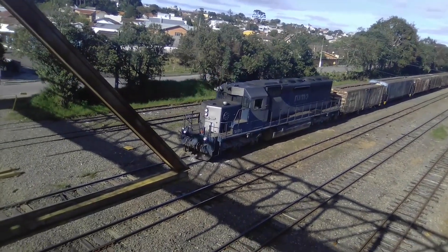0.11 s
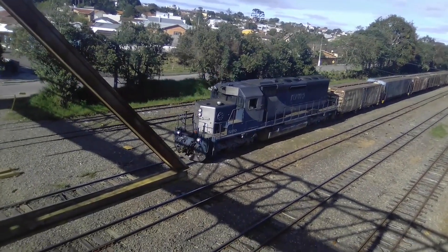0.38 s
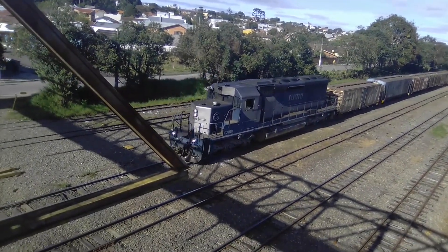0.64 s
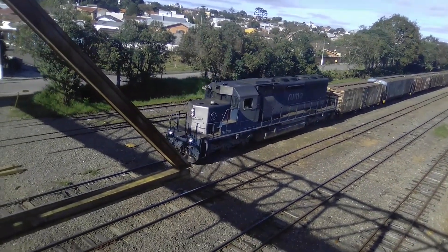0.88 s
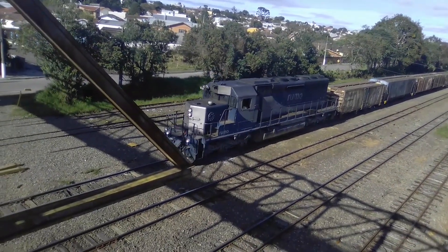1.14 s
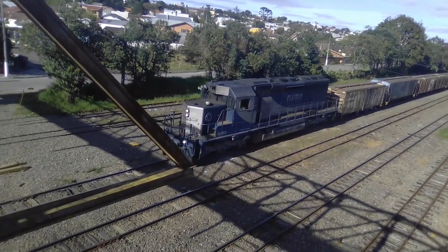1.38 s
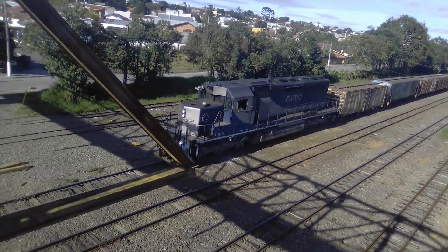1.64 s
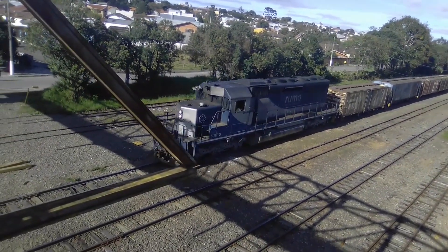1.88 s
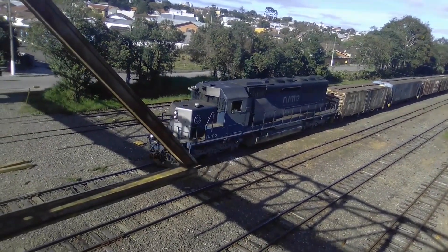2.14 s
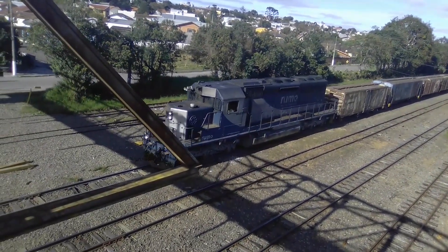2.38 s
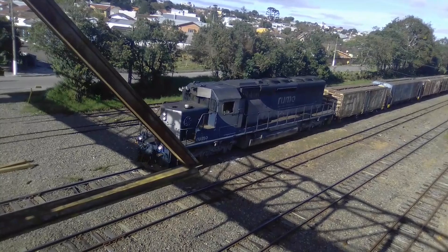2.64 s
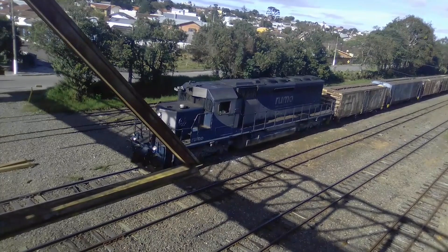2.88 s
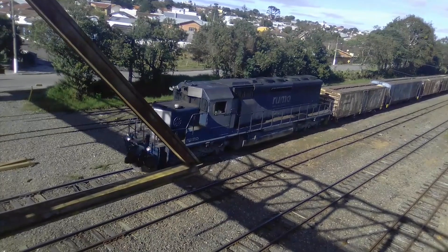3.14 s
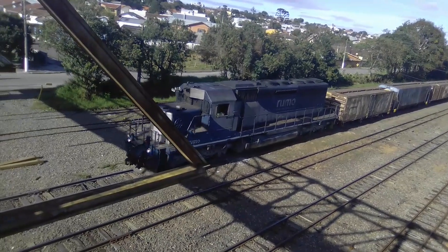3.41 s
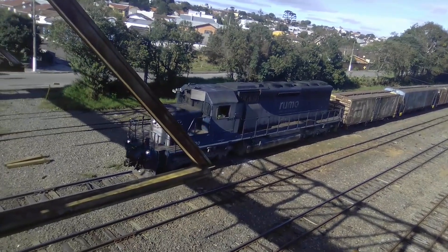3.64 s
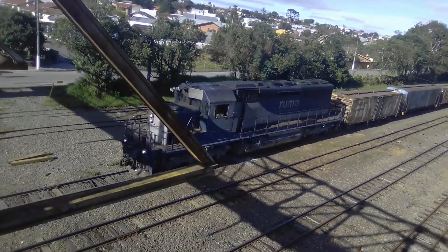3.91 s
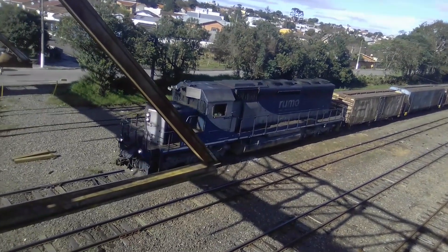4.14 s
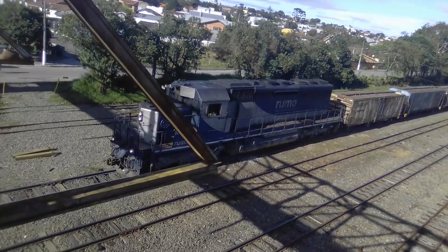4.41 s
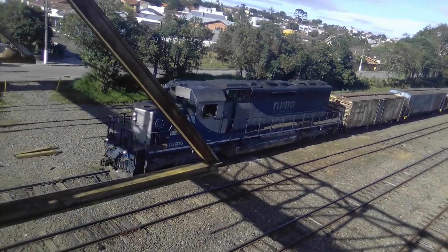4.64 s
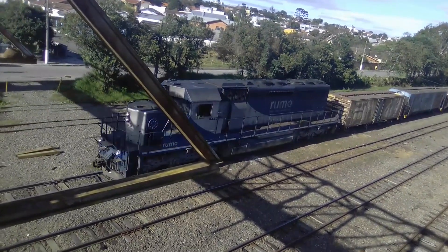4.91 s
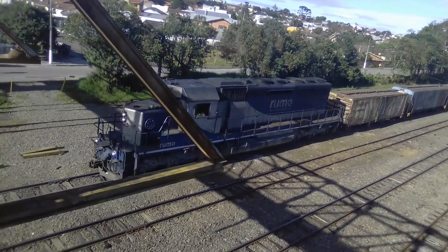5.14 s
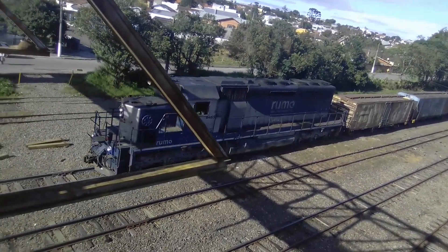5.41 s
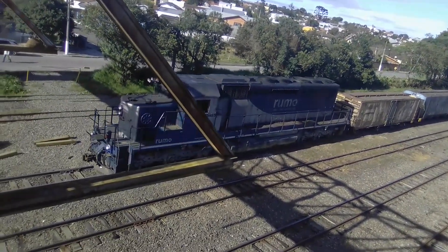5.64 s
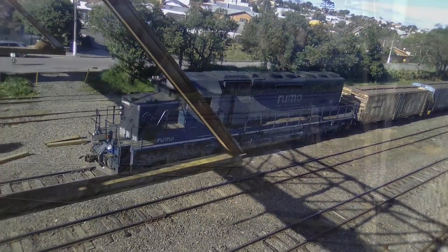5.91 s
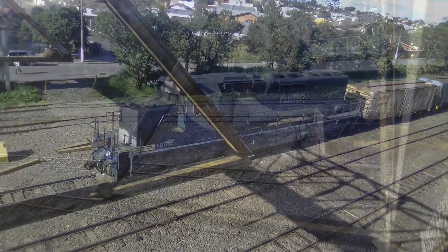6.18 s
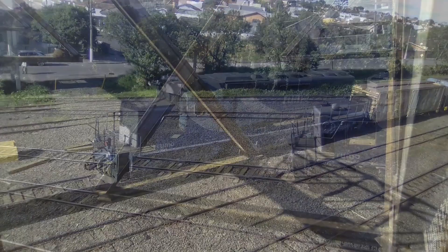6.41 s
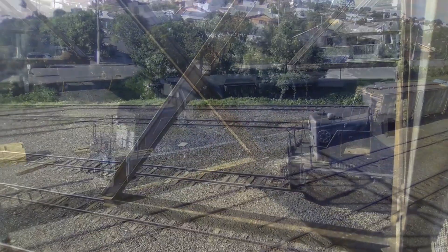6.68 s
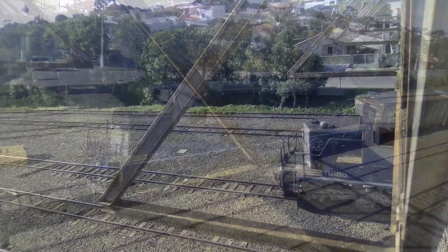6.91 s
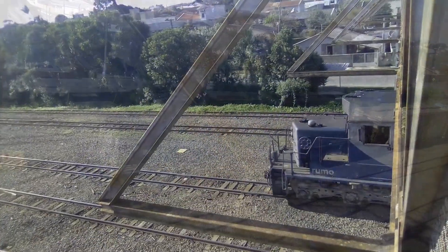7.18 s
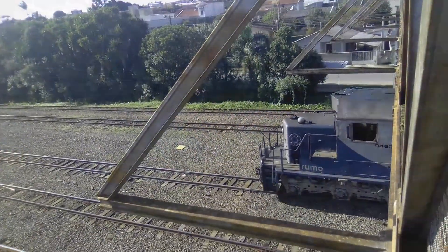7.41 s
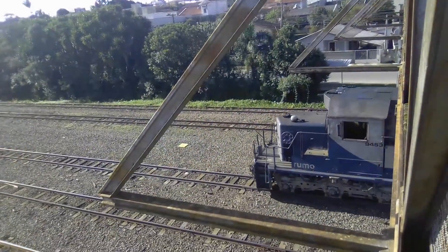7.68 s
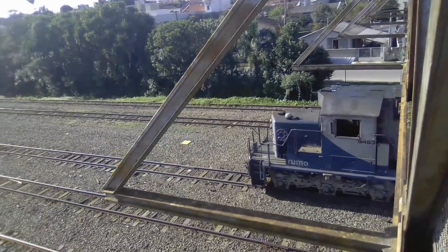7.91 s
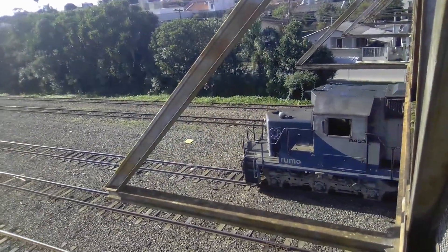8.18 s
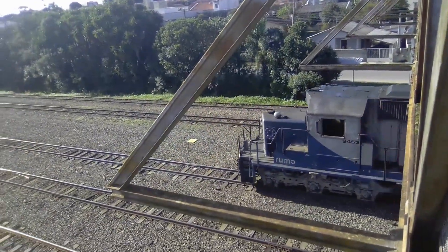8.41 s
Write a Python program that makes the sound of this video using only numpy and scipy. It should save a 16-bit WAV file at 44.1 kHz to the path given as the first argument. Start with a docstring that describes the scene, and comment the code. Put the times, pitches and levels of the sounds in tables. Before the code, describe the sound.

Outdoors in a rail yard, a large diesel locomotive idles past with a low, uneven throb, broadband roar, wavering gear whines and a high blower whistle. Faint metal ticks come near three seconds. The roar swells with a hollow howl, then dissolves into a closer, bassier view. A small distant air puff, a knock and a loud brief air blast with echo fall in the change, followed by a coupling clank and steady throbbing.

```python
"""A far-off exhaust throb, patterned once a crank turn, runs from the start with engine roar, gear whine and
a blower whistle: a sixteen-cylinder diesel locomotive idles slowly through a rail yard, cross-faded to a
close view. Firing pulses ring through a pipe; fans, wheels and air are coloured noise; gears, blower and
upper exhaust tones are wavering sines tied to the crank. Loose metal ticks, knocks and a coupling clank are
short noise bursts. A hollow howl swells in the roar, and air valves blow off with an echo."""
import sys
import numpy as np
from scipy import signal
from scipy.fft import rfft, irfft, next_fast_len
from scipy.io import wavfile
from scipy.ndimage import uniform_filter1d

SR = 44100
rng = np.random.default_rng(int(sys.argv[2]) if len(sys.argv) > 2 else 0)


def makeup_ratio(level_db):
    """Linear amplitude ratio for a level in decibels (20 dB per factor of ten)."""
    decades = np.asarray(level_db, float) / 20
    return 10 ** decades


def to_wav(s):
    """Save 16-bit WAV."""
    ch = np.atleast_2d(s).T  # columns
    pcm = np.round(np.clip(ch, -1, 1) * 32767)  # PCM
    wavfile.write(sys.argv[1], SR, pcm.astype(np.int16))


N = 377055
T = np.arange(N) / SR  # time of every sample [s]

# Crankshaft, far then near: (speed [turns/s], drift [turns/s^2], moment of that speed [s])
CRANK = [(5.38159, .00117, 3.0), (5.42586, -.01408, 7.8)]
# Firings as they arrive at each vantage point, before the pipe rings: (crank angle [deg], strength [dB])
FIRING_FAR = [(16.4, -2.0), (34.8, -4.1), (66.3, -7.0), (76.8, -1.3), (117.0, -7.7), (140.3, -8.7),
              (161.2, 2.1), (186.6, -6.5), (207.3, 4.3), (217.0, -1.3), (233.9, -3.2), (259.6, -1.3),
              (289.0, -0.0), (307.0, -0.9), (335.1, -1.3), (350.3, 3.6)]
FIRING_NEAR = [(12.3, -4.6), (37.8, -19.4), (62.1, -9.8), (91.7, -3.1), (109.0, -11.6), (139.5, -5.1),
               (164.4, -15.4), (180.9, 4.1), (197.1, -3.7), (228.5, -3.0), (260.0, 1.8), (268.9, 3.6),
               (280.9, -3.9), (327.5, -9.6), (347.5, 1.7), (354.9, -0.6)]
# Resonances of the exhaust pipe: (frequency [Hz], width [Hz], level [dB])
PIPE_FAR = [(50.0, 5.0, 13.9), (65.0, 90.0, 0.0), (114.8, 82.6, -3.4), (140.0, 16.3, -14.8)]
PIPE_NEAR = [(44.6, 5.0, 8.3), (86.3, 8.0, 0.0), (150.0, 100.0, -35.7), (165.1, 10.0, -18.1)]
STACK_HZ = 90  # corner below which the open stack radiates poorly
# Exhaust loudness, far then near: (time [s], deep throb level [dB], firing drone level [dB])
EXHAUST_LEVELS = [
    [(0.5, -31, -27), (2.0, -29.5, -26.5), (3.3, -26.8, -25), (4.4, -28.5, -24.5), (5.0, -30.5, -24.5),
     (5.65, -31.5, -23), (6.0, -32, -25.5), (6.4, -30, -26.5)],
    [(7.1, -21, -24.5), (7.4, -22, -24), (7.7, -20.5, -22), (8.55, -20.5, -22.5)],
]
# Upper exhaust tones on multiples of the crank speed, at the drone's mean level:
# (multiple [crank orders], far level [dB], near level [dB])
EXHAUST_TONES = [(23, -60, -46), (26, -58, -54), (29, -54, -47), (31, -47, -52), (32, -57, -56),
                 (34, -58, -53), (35, -55, -52), (36, -55, -53), (37, -53, -60)]
# Noise colours, only the shape counts: (frequency [Hz], density [dB per Hz])
RUMBLE_COLOUR = [(10, -8), (22, 0.5), (33, 3), (45, -5), (70, -13), (110, -0.5), (165, 1), (200, -3.5),
                 (225, -11.5), (270, -35)]
ROAR_FAR = [(120, -33), (210, -17), (227, -8), (285, -2.5), (697, -9), (801, -10), (866, -12.5),
            (1350, -17.5), (1760, -57), (2970, -120)]
ROAR_NEAR = [(120, -50), (210, -14.5), (291, -5.5), (322, -16.5), (401, -4), (454, -7.5), (551, -14),
             (629, -10.5), (840, -15), (1350, -26), (1760, -59), (2970, -120)]
HISS_FAR = [(790, -44), (1350, -10.5), (1520, -7), (1860, -13), (2200, -9), (2800, -12.5), (3500, -16),
            (4000, -10.5), (4560, -15.5), (5400, -12.5), (6900, -20.5), (8900, -23.5), (11000, -34),
            (15700, -45.5)]
HISS_NEAR = [(790, -34), (1350, -12.5), (1520, -11.5), (1880, -15), (2830, -16), (3690, -15.5),
             (4600, -15.5), (5200, -15), (6170, -12.5), (6700, -18.5), (9200, -21.5), (11500, -34),
             (15700, -44)]
# The engine draws nearer, far then near view; levels before the trims of each layer:
# (loudest time [s], roar level [dB], fan hiss level [dB], growth [dB/s], time to lose 20 dB after [s])
APPROACH = [(5.65, -37.8, -45, .4, 2.6), (7.9, -38.2, -45.3, .8, 2.6)]
# Gear whines, before swells and drift:
# (far frequency [Hz], near frequency [Hz], far level [dB], near level [dB], phase waver [rad])
GEARS = [(422, 400, -55, -52, 1.5), (545, 549, -60.5, -53, 1.3), (851.6, 856, -58, -59, .7),
         (1465, 1475, -59.5, -60, .6), (1519, 1530, -53.5, -53, .5), (2984, 3009, -56.5, -57, .9)]
# Weaker gear whines: (far frequency [Hz], near frequency [Hz], level [dB])
WEAK_GEARS = [(1276, 1281, -65), (1550, 1567, -58), (3040, 3060, -63), (1701, 1712, -66), (2126, 2143, -63),
              (2331, 2347, -63)]
# One list per main gear, where its whine swells or sinks: (time [s], half length [s], change [dB])
GEAR_SWELLS = [
    [(1.0, .5, 2), (3.75, 0.19, 4), (4.5, .15, 6), (5.6, 0.36, 8), (6.35, 0.37, 11), (7.0, .15, 6),
     (7.5, .15, 5), (8.05, .3, 6)],
    [(2.55, .25, 7), (4.0, .2, 5), (6.0, .15, 7), (7.65, .3, 3.5), (8.0, .15, 5), (8.5, 0.25, 7)],
    [(.8, .3, 3), (2.0, .8, 9), (3.7, .4, 2.5), (4.7, .45, 7.5), (7.0, .15, 8.5), (7.62, .25, 11.5),
     (8.5, .2, 4.5)],
    [(1.3, .25, 6), (2.75, .2, 6), (3.8, .45, 6), (4.5, .15, 11), (5.0, .2, 9.5), (5.5, .2, 6),
     (7.9, .45, 7)],
    [(.4, .25, -6), (1.0, .35, 4), (2.0, .55, 4), (3.0, .35, 7.5), (3.75, .15, 3), (4.45, 0.29, 6.5),
     (5.75, .15, 3), (6.55, 0.27, 5), (7.0, 0.16, 6.5), (7.8, .25, 6), (8.5, .3, 8)],
    [(.75, .2, 5), (3.9, 0.28, 5.5), (5.2, 0.84, 8), (6.25, 0.13, 2.5), (7.0, .2, 3), (8.35, 0.27, 2.5)],
]
DRIFT_DB = 1.0  # slow chance drift of each main gear whine
UNEVEN = .0017  # how far the crank runs unevenly, as a share of its speed
FASTEST_TURN = .55  # part of the turn where the crank is fastest
# Blower whistle and overtones: (far frequency [Hz], near frequency [Hz], level against the whistle [dB])
BLOWER_TONES = [(4563, 4596, -2), (6040, 6150, -16), (9092, 9160, -24)]
# Which side tone is strongest: (time [s], distance from the centre [steps of eight crank orders])
BLOWER_LEAN = [(0, -.7), (2.0, -.7), (3.3, -.2), (4.3, -.4), (5.5, .2), (8.5, .05)]
# Blower whistle loudness, before tone and side-tone offsets: (time [s], level [dB])
WHISTLE_LEVELS = [(0, -53), (1.2, -51.5), (1.7, -53), (2.4, -49), (3.6, -51), (4.6, -48.5), (5.2, -50),
                  (5.7, -47), (6.4, -46), (7.1, -48), (7.4, -44.5), (7.7, -51), (8.0, -47), (8.3, -45),
                  (8.55, -49)]
# Hollow howl as the far engine draws level:
# (fullest time [s], level [dB], growth [dB/s], time to lose 20 dB [s])
HOWL = (5.7, -45.5, 4, 0.9)
# Colour of the howl, only the shape counts: (frequency [Hz], density [dB per Hz])
HOWL_COLOUR = [(520, -42), (620, -5), (700, 6), (770, -5), (900, -40)]
# Loose metal ticks along the train, level before attack and decay: (time [s], level [dB])
RATTLE = [(2.783, -49), (2.818, -49), (2.846, -50), (2.876, -46), (2.936, -46), (2.953, -47), (2.967, -47),
          (2.996, -47), (3.027, -49), (3.087, -46), (3.103, -46)]
# Bands of one tick: (frequency [Hz], level [dB], time to fall 60 dB [s])
RATTLE_RING = [(8200, 0, .02)]
# Single knocks, level before attack and decay: (time [s], level [dB], centre frequency [Hz])
KNOCKS = [(5.163, -37, 3400), (6.616, -37.5, 2100)]
KNOCK_T60_S = .04
# A coupling takes up slack, level before attack and decay: (time [s], level [dB])
CLANK = (7.246, -32)
# Bands of the clank: (frequency [Hz], level [dB], time to fall 60 dB [s])
CLANK_RING = [(420, 0, .14), (724, -2, .1), (3400, -8, .08), (5300, -5, .12)]
# Air valves, close by and further away, level before flutter:
# (opens [s], full [s], shuts [s], level [dB], time to lose 20 dB [s])
VALVE_NEAR = (6.68, 6.845, 6.89, -25.7, .08)
VALVE_FAR = (6.25, 6.38, 6.41, -46.5, .12)
# Colour of the air blast, only the shape counts: (frequency [Hz], density [dB per Hz])
BLAST_COLOUR = [(700, -34), (1500, -15.5), (2400, -9.5), (3320, -7.5), (4500, -3), (6170, 0), (8000, -4),
                (10600, -11), (12400, -19), (14300, -15), (15700, -19)]
OPENING_S, BUILD_DB_PER_S = .015, 95  # first rush, then the pressure builds
# The far view dissolves into the near one: (start [s], end [s])
FADE = (6.14, 7.37)


def unit(x):
    """Scaled to rms 1."""
    return x / np.sqrt(np.mean(x ** 2) + 1e-20)


def curves(rows):
    """One value per sample for each column after the time."""
    s, *columns = np.transpose(rows)
    return [np.interp(T, s, column) for column in columns]


def wobble(rate):
    """A random curve, rate knots a second."""
    knots = rng.standard_normal(int(N * rate / SR) + 2)
    return np.interp(T * rate, np.arange(len(knots)), knots)


def hump(peak_s, db, build_db_per_s, shut_s):
    """A level in dB that climbs steadily to its peak, then falls ever faster."""
    climb_db = build_db_per_s * np.maximum(peak_s - T, 0)
    fall_db = 20 * (np.maximum(T - peak_s, 0) / shut_s) ** 2
    return db - climb_db - fall_db


def filtered(x, response):
    """x shaped by a complex response of frequency."""
    m = next_fast_len(N + SR // 2)
    spectrum = rfft(x, m) * response(np.fft.rfftfreq(m, 1 / SR))
    return irfft(spectrum, m)[..., :N]


def rush(colour, patchy_db):
    """Turbulent noise of rms 1: random gain patches in time and pitch, then coloured."""
    z = signal.stft(rng.standard_normal(N + 512), nperseg=512)[2]
    patches = uniform_filter1d(rng.standard_normal(z.shape), 5, 0)  # blurred across pitch
    patches = uniform_filter1d(patches, 12, 1)  # blurred across time
    noise = signal.istft(z * makeup_ratio(patchy_db * unit(patches)), nperseg=512)[1][:N]
    f, db = np.transpose(colour)
    return unit(filtered(noise, lambda hz: makeup_ratio(np.interp(np.log(hz + 1), np.log(f), db, -120, -120))))


def whine(hz, db, clock, flutter_db, flutter_rate, waver):
    """A tone tied to the crank's clock, swelling and wavering by chance."""
    level = np.sqrt(2) * makeup_ratio(db + flutter_db * wobble(flutter_rate))
    phase = 2 * np.pi * hz * clock + waver * wobble(2 * flutter_rate)
    return level * np.sin(phase)


def exhaust(turns, firing, pipe, stack_hz, deep_db, drone_db, scatter_db):
    """One pressure pulse per firing, the same uneven pattern every turn, rung through the pipe."""
    angle, db = np.transpose(firing)
    due = (np.arange(int(turns[-1]) + 1)[:, None] + angle / 360).ravel()
    size = makeup_ratio(np.resize(db, len(due)) + scatter_db * rng.standard_normal(len(due)))
    at_sample = np.interp(due, turns, np.arange(N)).astype(int)
    pulses = np.bincount(at_sample, size * (due < turns[-1]), N)

    def pipe_and_stack(f):
        # neighbouring resonances have opposite sign
        modes = sum((-1) ** k * makeup_ratio(g) * 1j * f * w / (c * c - f * f + 1j * f * w)
                    for k, (c, w, g) in enumerate(pipe))
        # the open stack radiates little bass, the silencer swallows the edges of the pulses
        stack = (1j * f / (stack_hz + 1j * f)) ** 2
        silencer = 1 / (1 + (f / 205) ** 12)
        return modes * stack * silencer

    out = filtered(pulses, pipe_and_stack)
    deep = filtered(out, lambda f: (f > 28) & (f < 57))
    drone = filtered(out, lambda f: f >= 57)
    return makeup_ratio(deep_db) * unit(deep) + makeup_ratio(drone_db) * unit(drone)


def upper_exhaust(view, clock, speed, drone_db):
    """Upper exhaust tones on multiples of the crank speed, following the drone's loudness."""
    follow_db = drone_db - drone_db.mean()
    return sum(whine(row[0] * speed, row[1 + view] + follow_db, clock, 1.5, 1.5, .3) for row in EXHAUST_TONES)


def engine_roar(view, roar, hiss):
    """Rumble, body and fan noise grow as the engine draws nearer; the fan hiss grows fastest."""
    loudest_s, roar_db, hiss_db, grows, sinks_s = APPROACH[view]
    nearer_db = hump(loudest_s, 0, grows, sinks_s)
    rumble = makeup_ratio(roar_db - 2.7 + nearer_db) * rush(RUMBLE_COLOUR, patchy_db=0.2)
    body = makeup_ratio(roar_db - 1.07 + nearer_db + 0.27 * wobble(5.5)) * rush(roar, patchy_db=0.28)
    fans = makeup_ratio(hiss_db + 1.3 * nearer_db + 0.8 * wobble(7)) * rush(hiss, patchy_db=1.1)
    return rumble + body + fans


def gears(view, clock):
    """Meshing teeth of the gear train; their pitch swings once a crank turn."""
    speed = CRANK[view][0]
    swing = np.sin(2 * np.pi * (clock * speed - FASTEST_TURN))
    clock = clock + UNEVEN / (2 * np.pi * speed) * swing
    whines = 0
    for row, swells in zip(GEARS, GEAR_SWELLS):
        swell_db = sum(db * np.exp(-((T - s) / half) ** 2) for s, half, db in swells)
        level_db = row[2 + view] + swell_db + DRIFT_DB * wobble(3)
        whines = whines + whine(row[view], level_db, clock, 2.36, 14.0, row[-1])
    for row in WEAK_GEARS:
        whines = whines + whine(row[view], row[2], clock, 2.5, 11.0, 1.2)
    return whines


def blower(view, clock, speed, whistle_db):
    """Eight exhaust gusts a turn split the blower whistle into side tones; overtones are rougher."""
    lean = curves(BLOWER_LEAN)[0]
    whistle = 0
    for row in BLOWER_TONES:
        roughness = 1.4 + .12 * abs(row[2])  # phase waver [rad]
        for k in (-2, -1, 0, 0.83, 1.8):  # side tones, in steps of eight crank orders
            level_db = whistle_db + row[2] - 5.3 * abs(k - lean)
            whistle = whistle + whine(row[view] + k * 8 * speed, level_db, clock, 4.0, 20.0, roughness)
    return whistle


def locomotive(view, firing, pipe, roar, hiss):
    """The running engine from one vantage point (0 far, 1 near), all its tones on one crank clock."""
    speed, drift, when = CRANK[view]
    turns = speed * T + drift * (T - when) ** 2 / 2
    clock = turns / speed
    deep_db, drone_db = curves(EXHAUST_LEVELS[view])
    throb = exhaust(turns, firing, pipe, STACK_HZ, deep_db, drone_db, scatter_db=0.35)
    upper_tones = upper_exhaust(view, clock, speed, drone_db)
    noise = engine_roar(view, roar, hiss)
    whistle = blower(view, clock, speed, curves(WHISTLE_LEVELS)[0])
    return throb + upper_tones + noise + gears(view, clock) + whistle


def howl():
    """A narrow band of the roar stands out for a while."""
    return makeup_ratio(hump(*HOWL)) * rush(HOWL_COLOUR, patchy_db=2.0)


def knocks():
    """Metal strikes as noise bursts in half-octave bands, with a soft attack and quick decay."""
    out, t = np.zeros(N + SR), np.arange(SR // 8) / SR
    blows = [(s, db, RATTLE_RING) for s, db in RATTLE]
    blows += [(s, db, [(hz, 0, KNOCK_T60_S)]) for s, db, hz in KNOCKS]
    blows += [(*CLANK, CLANK_RING)]
    attack = 1 - np.exp(-t / 0.0016)
    for s, db, ring in blows:
        for hz, part_db, t60 in ring:
            band = signal.butter(2, [.85 * hz, 1.18 * hz], "band", fs=SR, output="sos")
            burst = unit(signal.sosfilt(band, rng.standard_normal(len(t))))
            out[round(s * SR):][:len(t)] += makeup_ratio(db + part_db - 60 * t / t60) * attack * burst
    return out[:N]


def jet(opens_s, full_s, shuts_s, db, shut_s):
    """Compressed air rushes out of an opening valve, swells to full flow and dies as it shuts."""
    gap = np.clip((T - opens_s) / OPENING_S, 0, 1)
    building_db = hump(full_s, db, BUILD_DB_PER_S, N / SR)
    shutting_db = hump(shuts_s, db, 0, shut_s)
    flow_db = np.minimum(building_db, shutting_db)
    return gap * makeup_ratio(flow_db + 1.6 * wobble(40)) * rush(BLAST_COLOUR, patchy_db=1.4)


def air_valve():
    """Wagon sides send the blow-off back later and duller; distance dulls the far puff."""
    blow, t = jet(*VALVE_NEAR), T[:SR // 2]
    tail = rng.standard_normal(len(t)) * makeup_ratio(-60 * t / 0.53)  # falls 60 dB in 0.53 s
    echo = signal.fftconvolve(blow, tail / np.linalg.norm(tail))[:N]
    distant = makeup_ratio(-1.5) * echo + jet(*VALVE_FAR)
    return blow + filtered(distant, lambda hz: 1 / np.sqrt(1 + (hz / 8000) ** 4))


def scene():
    """The two vantage points, cross-faded, with the howl, the valves and the knocks."""
    near = np.interp(T, FADE, [0, 1])
    far_view = locomotive(0, FIRING_FAR, PIPE_FAR, ROAR_FAR, HISS_FAR)
    near_view = locomotive(1, FIRING_NEAR, PIPE_NEAR, ROAR_NEAR, HISS_NEAR)
    engine = (1 - near) ** 0.61 * far_view + near ** 0.74 * near_view
    return (engine + howl() + knocks() + air_valve())[None]


def roll_off(x):
    """The treble ends steeply here."""
    return signal.sosfilt(signal.butter(12, 15870, fs=SR, output="sos"), x)


def record(dry):
    """The microphone has a narrow dip in the top octave and a steady offset."""
    heard = filtered(dry, lambda hz: makeup_ratio(-9 * np.exp(-((hz - 12700) / 350) ** 2)))
    mix = heard + 0.021
    return roll_off(mix)


dry = scene()
out = record(dry)
to_wav(out)
```